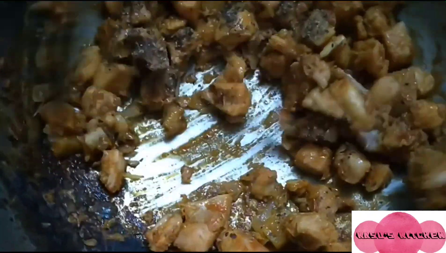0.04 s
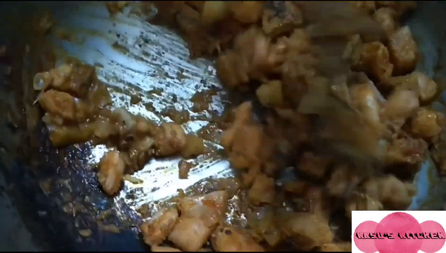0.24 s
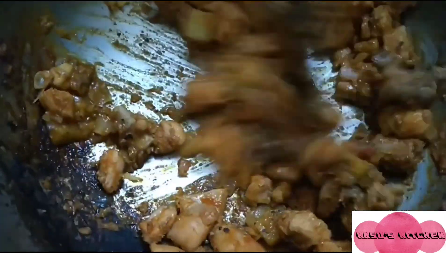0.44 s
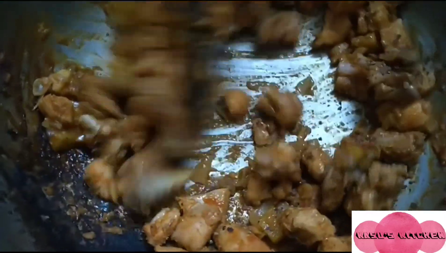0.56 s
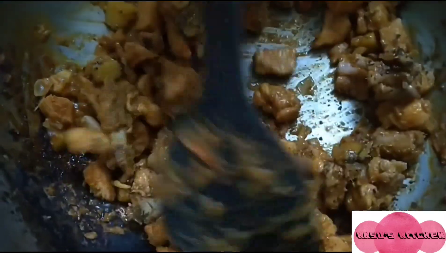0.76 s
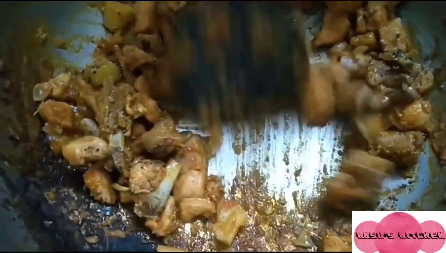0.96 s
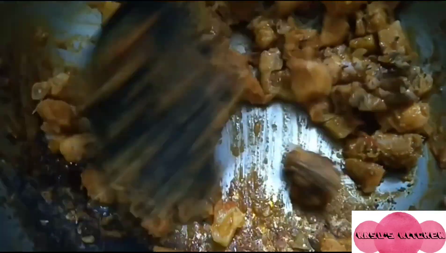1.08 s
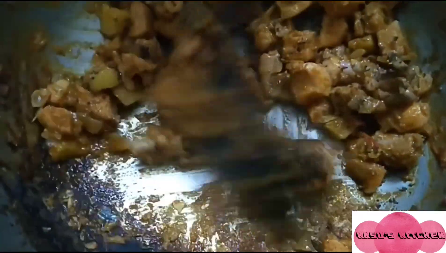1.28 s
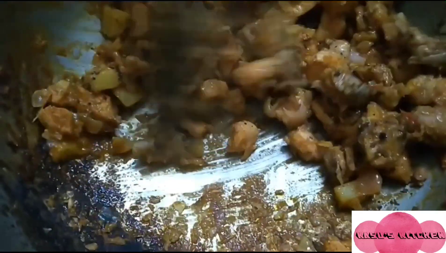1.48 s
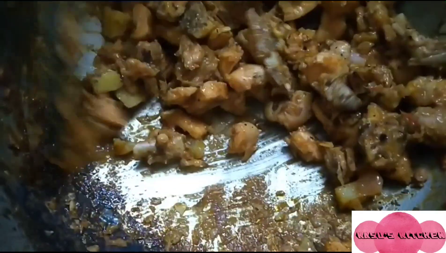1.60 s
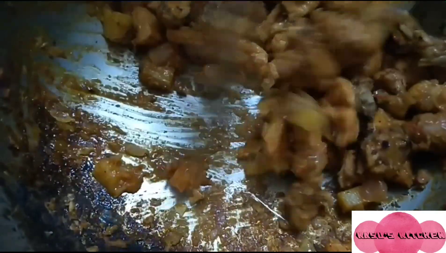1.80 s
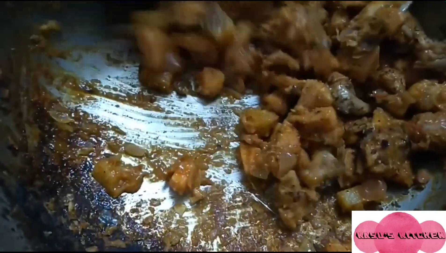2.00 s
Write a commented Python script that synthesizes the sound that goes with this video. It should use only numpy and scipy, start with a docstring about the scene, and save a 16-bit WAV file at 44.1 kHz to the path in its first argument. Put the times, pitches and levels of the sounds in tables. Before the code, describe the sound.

A spatula stirs moist chicken in a steel pan, close up. Soft crackle and small thuds lead to a loud, bright clack and short scrape at 0.25 s. Light taps, sticky crackles and dull landings follow, with a wet slap near 0.5 s, a faint scrape around 1.2 s and a softer knock at 1.36 s. A second sharp knock comes at 1.74 s, then a brief scraping judder and squeak. Low room hum throughout.

```python
"""In a small kitchen a spatula stirs moist pieces of cooked chicken in a steel pan, over a low room hum.
The blade knocks on the food-damped pan and taps lightly: clicks ring the modes of pan and spatula.
It judders and squeaks over the steel (random slips through a resonance); pieces land as low, short rings.
Sauce crackles with each stroke: coloured clicks, noise and ringing bubbles, with a few separate snaps.
Decaying noise gives the room's reflections; filtered noise and wavering sines give its background."""
import sys
import numpy as np
from scipy import signal
from scipy.fft import rfft, irfft, next_fast_len
from scipy.io import wavfile

SR = 44100
rng = np.random.default_rng(int(sys.argv[2]) if len(sys.argv) > 2 else 0)


def to_wav(s):
    """Save 16-bit WAV."""
    ch = np.atleast_2d(s).T  # columns
    pcm = np.round(np.clip(ch, -1, 1) * 32767)  # PCM
    wavfile.write(sys.argv[1], SR, pcm.astype(np.int16))


N = 90404
TIME = np.arange(N) / SR

# Steady room noise. Each row: frequency in Hz, relative density in dB per Hz.
FLOOR = [(25, -3.5), (60, -8.5), (100, -12), (170, -12.5), (280, -11), (400, -17), (850, -15),
         (1500, -19.5), (2500, -18.5), (5000, -39), (15000, -46.5)]
FLOOR_DB = -67.5
# Partials of the room hum. Each row: frequency in Hz, level in dB.
HUM = [(99, -73.5), (288, -76.5), (846, -78.5)]
HUM_WAVER, HUM_WAVER_HZ = 0.43, 7.3   # share of the level, rate

# Strokes through the food. Each row: start in seconds, length in seconds, level of the wet crackle in dB.
STROKES = [(0.0, 0.053, -55.5), (0.245, 0.093, -58), (0.382, 0.021, -60.5), (0.477, 0.22, -63),
           (0.691, 0.083, -68.5), (0.994, 0.11, -74.5), (1.06, 0.15, -64), (1.26, .02, -68),
           (1.326, 0.21, -63.5), (1.427, 0.13, -63.5), (1.792, 0.097, -60)]
STROKE_ATTACK_S, STROKE_RELEASE_DB_PER_S = 0.03, 202
# Tone of the sauce. Each row: frequency in Hz, relative density in dB per Hz.
SAUCE = [(150, 20.5), (400, -0.5), (1200, -6.5), (2400, 5), (3600, -2), (5200, -7), (8200, -3.5),
         (10800, -10), (15000, -6.5)]
CRACKLE_DB, CRACKLES_PER_S, CRACKLE_SPREAD_DB, SMEAR_DB = -2.5, 600, 3, -3
BUBBLE_DB, BUBBLES_PER_S, BUBBLE_LOW_HZ, BUBBLE_HIGH_HZ = -13.5, 310, 6300, 16100
BUBBLE_CYCLES = 130   # cycles until a bubble has died by 60 dB
CLUMP_DB, CLUMPS_HZ = 3.5, 48.6   # the crackle comes in clumps
# Larger sauce bubbles snap. Each row: start in seconds, peak in dB ahead of the low cut.
SNAPS = [(0.282, -42), (0.307, -41), (0.56, -56), (0.739, -48.5), (0.968, -60), (1.074, -50.5),
         (1.426, -52), (1.489, -51), (1.538, -49), (1.811, -52), (1.8194, -43)]
SNAP_T60_S, SNAP_LOW_HZ = 0.019, 3920

# Decay of the room. Each row: frequency in Hz, time to fall by 60 dB in seconds.
ROOM_T60 = [(150, 0.41), (500, 0.41), (1200, 0.33), (2500, 0.7), (8000, 0.12), (15000, 0.75)]
ROOM_DB, ROOM_ONSET_S = -8.5, 0.0065

# Pieces land on the pan. Each row: start in seconds, level in dB ahead of the filters, pitch in Hz.
THUDS = [(0.03, -49.5, 216), (0.084, -45.5, 154), (0.220, -48.5, 198), (0.370, -51, 182), (0.493, -58, 186),
         (0.519, -44, 188), (0.585, -56, 163), (0.621, -46.5, 200), (0.674, -70, 158), (1.113, -53, 125),
         (1.209, -50, 215), (1.249, -52.5, 175), (1.362, -41, 170), (1.517, -50, 195)]
THUD_T60_S, THUD_SOFT_HZ, THUD_LOW_CUT_HZ = 0.048, 500, 97
PLOP_S, PLOP_LENGTH_S, PLOP_DB, PLOP_HZ = 0.519, 0.0086, -49.5, 895   # one wet piece slaps down
PLOP_WIDTH_HZ = 1100

# The blade touches down lightly. Each row: start in seconds, level in dB, contact brightness in Hz,
# relative level of the edge click in dB.
TAPS = [(0.0309, -52, 870, -46), (0.2195, -54, 960, -55.5), (0.368, -48.5, 900, -42.5),
        (0.487, -55, 1135, -43), (0.5837, -52, 2700, -60), (0.621, -69, 1480, -60),
        (0.668, -79, 1500, -41.5), (1.112, -56, 2420, -46.5), (1.183, -55.5, 1500, -41.5),
        (1.364, -56, 584, -81)]
# Modes of the spatula. Each row: frequency in Hz, level in dB, time to fall by 60 dB in seconds.
BLADE_MODES = [(215, -4.5, 0.037), (310, -3, 0.046), (453.4, -7, 0.058), (667, 3, 0.028),
               (1393, -3.5, 0.043), (2200, 2.5, 0.034), (2710, 3.5, 0.045), (4060, 5.5, 0.017)]
CHATTER_DB, CHATTER_T60_S, CHATTER_PER_S = -1, 0.054, 900   # the blade chatters as it settles
# Tone of the edge click. Each row: frequency in Hz, level in dB.
EDGE = [(1500, -5.5), (4200, -8), (5200, -18), (7000, -1.5), (8900, -2.5), (10200, -17), (15000, -11)]
EDGE_T60_S = 0.098

# The wet edge squeaks on steel. Each row: start in seconds, length in seconds, level in dB, pitch in Hz.
SQUEAKS = [(0.049, 0.018, -63, 8440), (0.058, 0.043, -68.5, 7660), (0.332, 0.025, -61.5, 6600),
           (1.117, 0.025, -56, 2170), (1.604, 0.026, -75, 7540), (1.866, 0.038, -65, 6960)]
# The blade sticks and slips on steel. Each row: start in seconds, length in seconds, level in dB,
# pitch of the judder in Hz.
SCRAPES = [(0.259, .011, -35.5, 2200), (0.299, 0.032, -46, 2040), (0.416, 0.01, -58, 2560),
           (0.584, 0.065, -58.5, 1760), (1.18, 0.15, -65, 2360), (1.828, 0.014, -44.5, 1990),
           (1.848, 0.068, -57, 2280)]
SQUEAK_WIDTH_HZ, JUDDER_WIDTH_HZ = 228, 614   # width of each of two resonators in a row
SLIPS_PER_S, SLIP_SPREAD_DB, SCRAPE_ATTACK_S = 1400, 3.2, 0.00067

# The blade strikes the pan. Each row: start in seconds, level in dB, contact brightness in Hz,
# clack pitch in Hz, blade crack level in dB, blade crack pitch in Hz, relative edge click level in dB.
KNOCKS = [(0.2497, -16, 3200, 970, -25, 3740, -39), (1.3630, -36, 860, 350, -48, 1170, -46),
          (1.7369, -22, 2230, 833, -19.5, 2180, -34.5)]
# Modes of the loaded pan. Each row: frequency in Hz, level in dB, time to fall by 60 dB in seconds,
# level of the lasting ring in dB.
PAN_MODES = [(195, -17.5, 0.037, -46), (305.7, -35, 0.095, -46.5), (488, -26, 0.12, -34.5),
             (636.5, -14.5, 0.028, -31.5), (856, -48, 0.095, -32.5), (975, -15.5, 0.027, -39),
             (1182, -19.5, 0.033, -31), (1426, -21.5, 0.08, -51), (1500, -48, 0.11, -47),
             (1823, -22, 0.061, -34.5), (2067, -23.5, .06, -35), (2254, -17.5, 0.048, -36),
             (2380, -14, 0.025, -39), (2486, -32, 0.076, -35)]
RING_T60_S = 0.31   # the faint ring that outlasts the damped blow
CLACK_DB, CLACK_OCTAVES = -0.5, 1.43   # first swing of the pan's base under the blade
CRACK_WIDTH_HZ, CRACK_T60_S = 690, 0.04   # crack of the stiff blade

CUTOFF_HZ = 15650


def from_db(db):
    """Decibels to gain."""
    return 10 ** (np.asarray(db) / 20)


def rms_one(x):
    """Scale to rms 1."""
    return x / np.sqrt(np.mean(x ** 2) + 1e-20)


def peak_one(x):
    """Scale to peak 1."""
    return x / (np.abs(x).max() + 1e-20)


def at_hz(points, hz):
    """Read a table on a log-frequency axis."""
    f, value = np.transpose(points)
    return np.interp(np.log(np.maximum(hz, 1)), np.log(f), value)


def butter(x, hz, kind, order=2):
    """Causal Butterworth filter."""
    sos = signal.butter(order, np.clip(hz, 10, .45 * SR), kind, fs=SR, output="sos")
    return signal.sosfilt(sos, x + 1e-18)


def colour(x, spectrum):
    """Shape by a table of (Hz, dB) with minimum phase, so that nothing sounds early."""
    size = next_fast_len(2 * N) // 2 * 2
    hz = np.arange(size // 2 + 1) * SR / size
    cepstrum = irfft(np.log(from_db(at_hz(spectrum, hz))))
    # fold the cepstrum onto positive time
    cepstrum[1:size // 2] *= 2
    cepstrum[size // 2 + 1:] = 0
    return irfft(rfft(x, size) * np.exp(rfft(cepstrum)))[:N]


def click(s):
    """A unit impulse at time s."""
    return 1. * (np.arange(N) == int(s * SR))


def burst(s, t60):
    """Noise that starts at s and falls by 60 dB in t60 seconds."""
    fade = from_db(-60 * np.maximum(TIME - s, 0) / t60)
    return rng.standard_normal(N) * (TIME >= s) * fade


def ring(x, hz, t60):
    """A unit click sets a dying sine of starting height 1 ringing."""
    r, w = np.exp(-np.log(1000) / (t60 * SR)), 2 * np.pi * hz / SR
    return signal.lfilter([0, np.sin(w)], [1, -2 * r * np.cos(w), r * r], x + 1e-18)


def resonate(x, hz, width_hz):
    """A resonance of the given width; rms 1."""
    r, w = np.exp(-np.pi * width_hz / SR), 2 * np.pi * hz / SR
    return rms_one(signal.lfilter([1, 0, -1], [1, -2 * r * np.cos(w), r * r], x + 1e-18))


def grains(per_s, spread_db):
    """Random clicks of uneven size and either sign."""
    sizes = from_db(spread_db * np.minimum(rng.exponential(1, N), 4)) * rng.choice([-1, 1], N)
    return sizes * (rng.random(N) < per_s / SR)


def drift(hz):
    """Slow random wander with rms 1."""
    r = np.exp(-2 * np.pi * hz / SR)
    wander = signal.lfilter([1], [1, -2 * r, r * r], rng.standard_normal(2 * N))
    return rms_one(wander[N:])   # skip the filter's start-up


def rub(s, length, db, hz, width_hz):
    """A short run of slips through two equal resonators: quick rise, then the pressure eases off."""
    rise = np.clip((TIME - s) / SCRAPE_ATTACK_S, 0, 1)
    ease = np.clip(1 - (TIME - s) / length, 0, 1) ** .5
    slips = resonate(grains(SLIPS_PER_S, SLIP_SPREAD_DB), hz, width_hz)
    slips = resonate(slips, hz, width_hz) * rise * ease
    # spread the energy over the whole scene, so that the level holds for the short run
    return from_db(db) * rms_one(slips) * np.sqrt(length / (2 * N / SR))


def background():
    """Steady coloured room noise with hum partials that waver in phase and level."""
    hum = 0
    for hz, db in HUM:
        tone = np.sin(2 * np.pi * hz * TIME + drift(HUM_WAVER_HZ))
        tone = tone * (1 + HUM_WAVER * drift(HUM_WAVER_HZ))
        hum = hum + from_db(db) * rms_one(tone)
    return hum + from_db(FLOOR_DB) * rms_one(colour(rng.standard_normal(N), FLOOR))


def sauce():
    """Sticky films tear and smear and tiny bubbles burst under each stroke; a few larger ones snap."""
    strokes = []
    for s, length, db in STROKES:
        attack = np.clip((TIME - s) / STROKE_ATTACK_S, 0, 1) ** .5
        release_db = STROKE_RELEASE_DB_PER_S * np.maximum(TIME - s - length, 0)
        strokes.append(from_db(db - release_db) * attack)
    vigour = np.max(strokes, axis=0)
    crackle = from_db(CRACKLE_DB) * rms_one(colour(grains(CRACKLES_PER_S, CRACKLE_SPREAD_DB), SAUCE))
    smear = from_db(SMEAR_DB) * rms_one(colour(rng.standard_normal(N), SAUCE))
    bubbles = 0
    for hz in np.geomspace(BUBBLE_LOW_HZ, BUBBLE_HIGH_HZ, 20):
        pops = grains(BUBBLES_PER_S / 20, CRACKLE_SPREAD_DB)
        bubbles = bubbles + ring(pops, hz, BUBBLE_CYCLES / hz) * from_db(at_hz(SAUCE, hz))
    bubbles = from_db(BUBBLE_DB) * rms_one(bubbles)
    films = (crackle + smear) * from_db(CLUMP_DB * drift(CLUMPS_HZ))
    bubbles = bubbles * from_db(CLUMP_DB * drift(CLUMPS_HZ))
    snaps = sum(from_db(db) * peak_one(burst(s, SNAP_T60_S)) for s, db in SNAPS)
    return vigour * (films + bubbles) + butter(snaps, SNAP_LOW_HZ, "high")


def kitchen(x):
    """Dense reflections, as noise that dies away at its own pace in each band."""
    edges = np.geomspace(70, 18000, 9)
    tail = 0
    for lo, hi in zip(edges, edges[1:]):
        t60 = at_hz(ROOM_T60, np.sqrt(lo * hi))
        tail = tail + butter(burst(ROOM_ONSET_S, t60), [lo, hi], "band")
    tail = tail / np.sqrt(np.sum(tail ** 2))
    return from_db(ROOM_DB) * signal.fftconvolve(x, tail)[:N]


def chicken():
    """Soft pieces land with low, quickly damped thuds, one with a wet slap."""
    thuds = sum(from_db(db) * ring(click(s), hz, THUD_T60_S) for s, db, hz in THUDS)
    thuds = butter(butter(thuds, THUD_SOFT_HZ, "low"), THUD_LOW_CUT_HZ, "high")
    return thuds + rub(PLOP_S, PLOP_LENGTH_S, PLOP_DB, PLOP_HZ, PLOP_WIDTH_HZ)


def taps():
    """A light touch and a dying chatter set the spatula itself ringing."""
    force = 0
    for s, db, soft_hz, _ in TAPS:
        chatter = burst(s, CHATTER_T60_S) * (rng.random(N) < CHATTER_PER_S / SR)
        # over sqrt(N), rms 1 has the energy of a unit click
        contact = click(s) + from_db(CHATTER_DB) * rms_one(chatter) / np.sqrt(N)
        force = force + from_db(db) * butter(contact, soft_hz, "low", order=1)
    # alternate modes swing in opposite directions
    return sum((-1) ** k * from_db(db) * ring(force, hz, t60)
               for k, (hz, db, t60) in enumerate(BLADE_MODES))


def edge_clicks():
    """The blade's thin edge adds a bright, dying noise click to every knock and tap."""
    clicks = sum(from_db(row[-1]) * burst(row[0], EDGE_T60_S) for row in KNOCKS + TAPS)
    return .5 * colour(clicks, EDGE)


def scrapes():
    """The blade sticks and slips: it judders across bare steel and now and then squeaks."""
    squeaks = sum(rub(*row, SQUEAK_WIDTH_HZ) for row in SQUEAKS)
    judders = sum(rub(*row, JUDDER_WIDTH_HZ) for row in SCRAPES)
    return squeaks + judders


def knocks():
    """Each blow gives a clack, ringing pan modes and a blade crack; softer contact dulls clack and ring."""
    strikes, force = 0, 0
    for s, db, soft_hz, clack_hz, crack_db, crack_hz, _ in KNOCKS:
        push = from_db(db) * butter(click(s), soft_hz, "low", order=1)
        clack_band = clack_hz * 2 ** (CLACK_OCTAVES * np.array([-.5, .5]))
        band_peak = np.abs(butter(click(0), clack_band, "band")).max()
        clack = -from_db(CLACK_DB) * butter(push, clack_band, "band") / band_peak
        crack_band = crack_hz + CRACK_WIDTH_HZ * np.array([-.5, .5])
        crack = from_db(crack_db) * butter(burst(s, CRACK_T60_S), crack_band, "band")
        strikes = strikes + clack + crack
        force = force + push
    ringing = 0
    for k, (hz, db, t60, ring_db) in enumerate(PAN_MODES):
        damped = from_db(db) * ring(force, hz, t60)
        lasting = from_db(ring_db) * ring(force, hz, RING_T60_S)
        ringing = ringing + (-1) ** (k + 1) * (damped + lasting)
    return strikes + ringing


def scene():
    """The pan, its room and the background, in mono."""
    pan = sauce() + chicken() + taps() + edge_clicks() + scrapes() + knocks()
    return (pan + kitchen(pan) + background())[None]


def record(dry):
    """The top is cut steeply by an elliptic low-pass."""
    return signal.sosfilt(signal.ellip(10, .1, 70, CUTOFF_HZ, fs=SR, output="sos"), dry)


dry = scene()
out = record(dry)
to_wav(out)
```